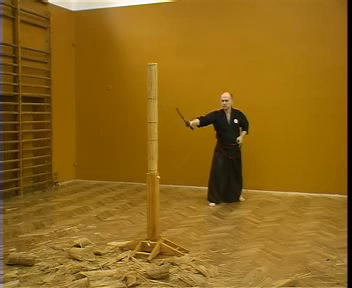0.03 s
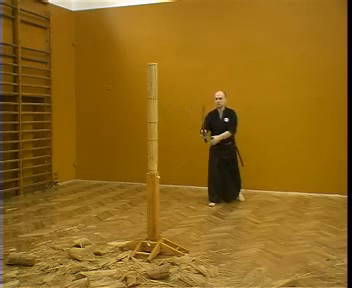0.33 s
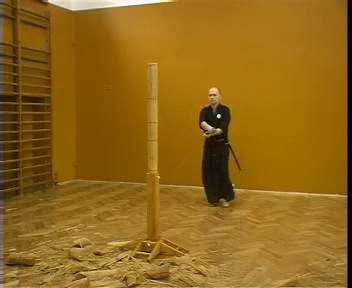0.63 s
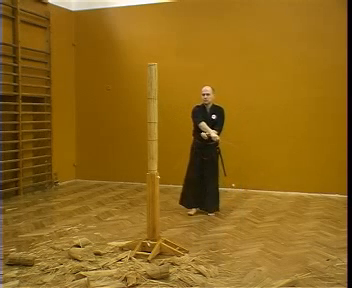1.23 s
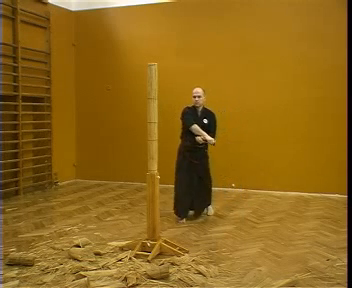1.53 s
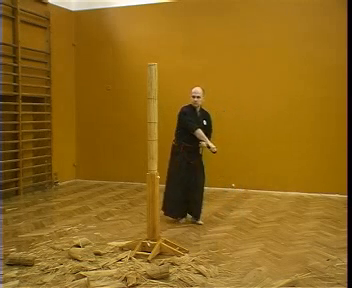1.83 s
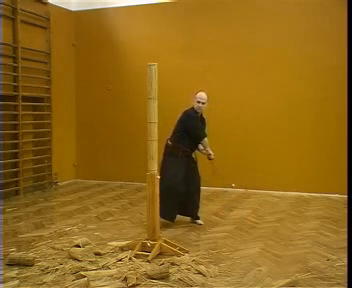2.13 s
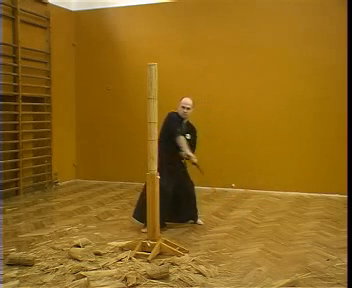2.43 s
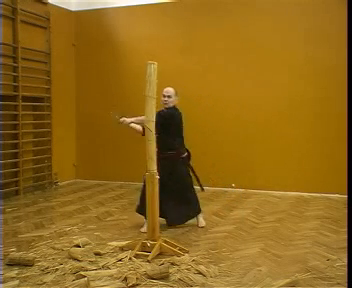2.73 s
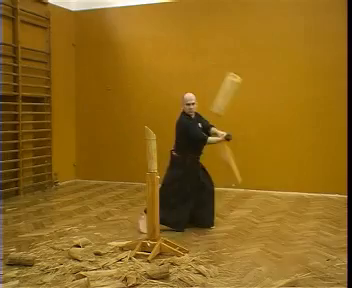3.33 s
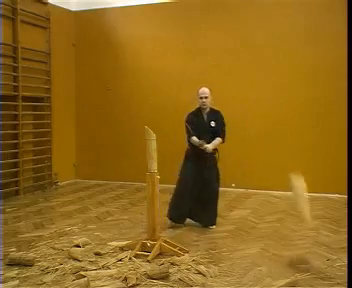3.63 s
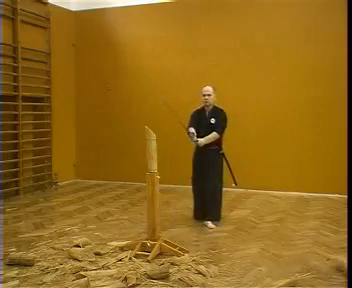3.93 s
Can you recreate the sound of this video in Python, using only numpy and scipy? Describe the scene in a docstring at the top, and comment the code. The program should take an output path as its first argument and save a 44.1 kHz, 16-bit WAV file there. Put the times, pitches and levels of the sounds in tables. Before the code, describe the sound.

A sword slices a straw roll twice, then the pieces slap down in a reverberant hall.

```python
"""Two sword cuts in a gym

Bare feet and robes move quietly over a mains buzz and the air of a hard, echoing hall.
A swordsman steps up to a rolled straw mat and cuts it twice: each cut is a crack and a short rip
of stalks. The severed pieces slap down on the parquet close by, thump and skid through loose straw."""
import sys
import numpy as np
from scipy import signal
from scipy.fft import rfft, irfft, next_fast_len
from scipy.io import wavfile
from scipy.ndimage import uniform_filter1d

SR = 44100
rng = np.random.default_rng(int(sys.argv[2]) if len(sys.argv) > 2 else 0)


def waveform_to_disk(signal):
    """Save audio, clipped to [-1, 1], as 16-bit WAV at the path in sys.argv[1]."""
    frames = np.transpose(np.atleast_2d(signal))
    scaled = np.clip(frames, -1, 1) * 32767
    samples = np.round(scaled).astype(np.int16)
    wavfile.write(sys.argv[1], SR, samples)


N = 176400

# Reverb time of the gym: f/Hz, t60/s
HALL_T60 = [(100, 5.4), (300, 7.7), (1200, 6.13), (3000, 3.5), (5000, 2.41), (8000, 0.97), (11000, 0.23)]
# EQ of the reverb: f/Hz, gain/dB
HALL_EQ = [(70, -41), (150, -4.5), (300, 1), (700, 1), (1300, 1.5), (2600, 1.5), (6000, 2), (11000, 6.5)]
# Stereo width of the events and reverb, then of the room tone: f/Hz, side/dB
WIDTH = [(25, -12), (60, -20), (130, -58), (300, -98), (550, -23), (1100, -11.5), (2200, -6), (4500, -3),
         (10000, -6.5)]
AIR_WIDTH = [(60, -1), (150, -28), (350, -14), (850, -6.5), (2050, 4.5), (4970, -0.5), (12000, -1)]
# Colour of the room tone: f/Hz, level/dB
AIR_EQ = [(18, -55), (30, -19.5), (266, -11.5), (294, -9), (325, -7), (397, -19), (428, -11), (593, -13),
          (639, -11.5), (821, -10), (1970, -19), (3180, -19.5), (12000, -30.5), (15600, -60), (22000, -120)]
# Strong mains partials, then the contour of the fine buzz on top: f/Hz, level/dB
HUM_PARTIALS = [(300, -66.5), (400, -64), (500, -69), (600, -66), (700, -72.5), (800, -68.5), (1000, -72.5),
                (1200, -68), (1700, -73)]
BUZZ_CONTOUR = [(1000, -78.5), (2200, -79), (2650, -76), (3300, -72), (3700, -82), (4500, -96)]
# Robes and sliding soles: t/s, level/dB, rise/s, decay/s, tilt/(dB/octave)
SWISHES = [(.23, -55.5, .04, 0.13, 2), (.9, -53.5, 0.065, .04, 1.5), (1.16, -49.5, 0.071, 0.079, -1.3),
           (1.321, -61.5, 0.065, .06, 1), (1.65, -56, 0.042, 0.18, -1.5), (1.88, -53, 0.092, 0.17, 2),
           (2.111, -48.5, 0.089, 0.063, 4), (2.28, -53.5, 0.076, 0.17, -1), (2.422, -56, 0.12, 0.073, 2),
           (2.671, -51.5, 0.14, 0.051, 7)]
# Barefoot steps: t/s, level/dB, decay/s, tilt/(dB/octave)
STEPS = [(1.413, -44, 0.011, -0.5), (1.435, -44, .008, -2), (1.50, -54, .02, 0), (1.802, -61, 0.0062, 0.5),
         (2.235, -52, 0.015, -2), (2.388, -43.5, 0.016, -3.5), (2.41, -45, 0.022, -0.5),
         (2.446, -48, 0.0068, -1), (2.525, -50, 0.03, -3.5), (2.654, -46.5, 0.0077, -5)]
# Pieces slapping the floor: t/s, level/dB, rise/s, decay/s, tilt/(dB/octave)
SLAPS = [(3.671, -20, 0.0014, 0.01, 3.1), (3.7024, -12.5, 0.0023, 0.004, 3.5),
         (3.7215, -13.5, 0.0061, 0.0052, 1), (3.726, -12.5, 0.0026, 0.0072, 1),
         (3.7347, -11.5, 0.0026, .004, 1.2), (3.763, -17, 0.0031, 0.0021, -1),
         (3.838, -21, 0.0016, 0.0045, -1)]
# Their weight on the boards: t/s, level/dB, f/Hz, decay/s
THUMPS = [(3.699, -43.5, 50, 0.0094), (3.702, -24.5, 200, 0.004), (3.745, -45.5, 155, 0.063),
          (3.882, -29.5, 169, 0.018), (3.919, -25.5, 239, 0.0094), (3.948, -26, 158, 0.059)]
# Their skids through straw: t/s, level/dB, rise/s, decay/s
SKIDS = [(3.785, -27, 0.027, 0.013), (3.915, -23, 0.043, 0.11), (3.97, -34, 0.02, 0.09)]
# Hollow notes of the roll: t/s, f/Hz, level/dB, decay/s, reverb/dB
KNOCKS = [(2.709, 1250, -16.5, 0.0033, -1), (2.7082, 2820, -21, 0.0021, -7), (3.194, 355, -26.5, 0.013, 8),
          (3.195, 468, -28.5, 0.011, 6.5), (3.1985, 1600, -13, 0.0017, -0.5),
          (3.674, 620, -26.5, 0.017, -4), (3.729, 645, -21.5, 0.0092, 0.5),
          (3.905, 500, -22.5, 0.0097, -2.5)]
# Sword cuts: t/s, crack/dB, rip/dB, rip length/s, thud/dB, crack tilt/(dB/octave), rip reverb/dB
CUTS = [(2.7102, -11, -18.5, 0.043, -40, 0.2, 3), (3.194, -11.5, -17, 0.038, -43.5, 3.3, 3)]
# Noise colour of cloth, step, slap, skid, crack and rip (one curve per cut): f/Hz, level/dB
SWISH_EQ = [(100, -14), (300, -8), (1300, -0.5), (3000, -3), (6000, -9), (11000, -23.5)]
STEP_EQ = [(60, -32), (150, -26), (240, -3.5), (400, -1.5), (700, -4.5), (1300, -9), (3000, -18),
           (10000, -30)]
SLAP_EQ = [(60, -52), (150, -20), (330, -1.5), (480, -5), (680, 2), (1080, -14.5), (1400, -1.5), (2000, 0),
           (3000, -8.5), (4450, -7), (6500, -10.5), (10000, -18.5), (12000, -34)]
SKID_EQ = [(59, -49), (100, -20), (159, -7.5), (256, -12.5), (339, -14), (375, -30), (423, -7), (981, -12),
           (2520, -10), (3070, -13), (7130, -16), (12000, -31), (15600, -60), (22000, -120)]
CRACK_EQ = [(60, -30), (150, -9.5), (400, -5), (750, -13.5), (1300, 4.5), (2000, -0.5), (3100, 2),
            (4700, 0.5), (5800, -3), (7500, -4), (10000, -5), (12000, -22)]
RIP_EQS = [
    [(60, -50), (130, -10), (290, 3.5), (400, -16), (520, 0.5), (850, -2), (1250, -2.5), (1900, -1.5),
     (3200, 0.5), (4700, 0.5), (7000, -1), (10000, -4.5), (12000, -7)],
    [(60, -52), (130, -17), (330, 0), (480, -2), (600, -6), (1100, 3.5), (1600, -4), (2400, 1.5), (3300, 4),
     (4900, 3), (7000, 2), (10000, -4), (12000, -17)],
]

PREDELAY_S, HALL_BUILD_S, HALL_BLUR_OCT = 0.013, 0.0023, 0.11
MAINS_HZ, HEEL_HZ, THUD_HZ, TOP_HZ = 50, 250, 55.5, 12000
AIR_DB, HEEL_DB, SPLIT_DB = -54.5, -5, -11.5
THUMP_RISE_S, CRACK_RISE_S, RIP_DELAY_S = 0.00485, 0.0021, 0.006


def amp(db):
    return 10 ** (np.asarray(db) / 20)


def unit_rms(x):
    return x / np.sqrt(np.mean(x ** 2) + 1e-20)


def curve(points, hz):
    """Read a breakpoint curve on a log frequency axis."""
    f, values = np.transpose(points)
    return np.interp(np.log(hz + 1), np.log(f + 1), values)


def filtered(x, response):
    """Apply a gain that depends on frequency."""
    n = x.shape[-1]
    padded = next_fast_len(n + 4096)
    return irfft(rfft(x, padded) * response(np.fft.rfftfreq(padded, 1 / SR)), padded)[..., :n]


def spread(pair, side_db=0, width=WIDTH):
    """Mix two unrelated signals, as mid and side, to left and right."""
    side = filtered(pair[1], lambda hz: amp(curve(width, hz) + side_db))
    return np.array([pair[0] + side, pair[0] - side])


def pan(x, left_db):
    return x * amp([[left_db], [-left_db]])


def crackle(eq, tilt_db, grain, side_db):
    """A second of coloured stereo noise, clumped into millisecond snaps."""
    clumps = np.exp(grain * unit_rms(uniform_filter1d(rng.standard_normal(SR), size=30)))
    snaps = clumps * rng.standard_normal((2, SR))
    colour = lambda hz: amp(curve(eq, hz) + tilt_db * np.log2(np.maximum(hz, 200) / 2000))
    return unit_rms(spread(filtered(snaps, colour), side_db))


def clock():
    """A second of time around an event, starting a quarter second early."""
    return (np.arange(SR) - SR // 4) / SR


def swell(rise, decay, hold=0):
    """Bell-shaped attack up to time zero, hold, exponential release; all in seconds."""
    t = clock()
    return np.exp(-(np.minimum(t, 0) / rise) ** 2 - np.maximum(t - hold, 0) / decay)


def place(at, x):
    """Lay an event on the timeline with its time zero on the cue."""
    track = np.zeros((2, N + 2 * SR))
    start = round(at * SR) + SR - SR // 4
    track[:, start:start + SR] = x
    return track[:, SR:SR + N]


def in_hall(x, wet_db):
    """Add the gym's diffuse wash: each band stores the energy it receives and leaks it, treble first."""
    delayed = np.interp(np.arange(N) - PREDELAY_S * SR, np.arange(N), x.mean(0))
    hz, t, spectra = signal.stft(delayed, SR, nperseg=512)
    octave = np.log2(hz + 1)
    blur = np.exp(-.5 * ((octave[:, None] - octave) / HALL_BLUR_OCT) ** 2)
    received = blur / blur.sum(1, keepdims=True) @ np.abs(spectra) ** 2
    tail = amp(-60 * t / curve(HALL_T60, hz)[:, None]) ** 2 * (1 - np.exp(-t / HALL_BUILD_S))
    stored = np.abs(signal.fftconvolve(received, tail * t[1], axes=1)[:, :len(t)])
    noise = signal.stft(rng.standard_normal((2, N)), nperseg=512)[2]
    wash = signal.istft(2 * np.sqrt(stored) * noise / noise.std(), nperseg=512)[1][:, :N]
    return x + amp(wet_db) * spread(filtered(wash, lambda f: amp(curve(HALL_EQ, f))))


def room_tone():
    """The hall's air: a steady bed of soft noise."""
    air = filtered(rng.standard_normal((2, N)), lambda hz: amp(curve(AIR_EQ, hz)))
    return amp(AIR_DB) * unit_rms(spread(air, width=AIR_WIDTH))


def mains_buzz():
    """Electrical harmonics: a hum with a fine comb of partials on top."""
    t = np.arange(N) / SR
    comb = [(hz, curve(BUZZ_CONTOUR, hz)) for hz in np.arange(20, 80) * MAINS_HZ]
    partials = HUM_PARTIALS + comb
    return np.sqrt(2) * sum(amp(db) * np.sin(2 * np.pi * (hz * t + rng.random())) for hz, db in partials)


def swishes():
    """Robes and sliding soles rub in soft swells of noise."""
    track = 0
    for at, db, rise, decay, tilt_db in SWISHES:
        friction = crackle(SWISH_EQ, tilt_db, grain=0.21, side_db=2.5)
        track += place(at, amp(db) * swell(rise, decay) * friction)
    return in_hall(track, wet_db=1.5)


def footsteps():
    """Bare heels land with a dull pat and sound a low note in the boards."""
    board = amp(HEEL_DB) * np.sqrt(2) * np.sin(2 * np.pi * HEEL_HZ * clock())
    track = 0
    for at, db, decay, tilt_db in STEPS:
        pat = crackle(STEP_EQ, tilt_db, grain=0.26, side_db=7)
        track += place(at, amp(db) * swell(0.003, decay) * (board + pat))
    return in_hall(track, wet_db=1.5)


def landings():
    """The severed pieces slap the parquet, thump the boards and skid on through straw."""
    slaps = thumps = skids = 0
    for at, db, rise, decay, tilt_db in SLAPS:
        smack = crackle(SLAP_EQ, tilt_db, grain=0.36, side_db=-10)
        slaps += place(at, amp(db) * swell(rise, decay) * smack)
    for at, db, hz, decay in THUMPS:
        board = np.sin(2 * np.pi * hz * clock())
        thumps += place(at + THUMP_RISE_S, amp(db) * swell(THUMP_RISE_S, decay) * board)
    for at, db, rise, decay in SKIDS:
        straw = crackle(SKID_EQ, tilt_db=0, grain=0.23, side_db=-18)
        skids += place(at, amp(db) * swell(rise, decay) * straw)
    return in_hall(slaps, wet_db=1.5) + in_hall(thumps, wet_db=-5) + in_hall(skids, wet_db=1.5)


def mat_knocks():
    """The roll gives hollow, heavily damped notes as it is cut and as it lands."""
    track = 0
    for at, hz, db, decay, wet_db in KNOCKS:
        note = np.sin(2 * np.pi * (hz * clock() + rng.random()))
        track += in_hall(place(at, amp(db) * swell(0.00094, decay) * note), wet_db)
    return track


def sword_cuts():
    """The edge cracks into the roll and jolts the stand, then rips through the stalks."""
    jolt = swell(rise=0.003, decay=0.005) * np.cos(2 * np.pi * THUD_HZ * clock())
    bite = swell(CRACK_RISE_S, decay=0.003) + amp(SPLIT_DB) * swell(CRACK_RISE_S, decay=0.006)
    track = 0
    for (at, crack_db, rip_db, length, thud_db, tilt_db, rip_wet_db), rip_eq in zip(CUTS, RIP_EQS):
        crack = amp(crack_db) * bite * crackle(CRACK_EQ, tilt_db, grain=0.43, side_db=-26)
        stalks = pan(crackle(rip_eq, tilt_db=0, grain=0.18, side_db=-2), left_db=0.5)
        rip = amp(rip_db) * swell(rise=0.0075, decay=0.0079, hold=length - RIP_DELAY_S) * stalks
        track += in_hall(place(at, crack), wet_db=-1.5)
        track += in_hall(place(at + RIP_DELAY_S, rip), rip_wet_db)
        track += place(at, amp(thud_db) * jolt)
    return track


def scene():
    """The full mix, leaning a hair to the left."""
    action = sword_cuts() + mat_knocks() + landings() + footsteps() + swishes()
    return pan(action + room_tone() + mains_buzz(), left_db=0.13)


def record(dry):
    """A soft clip rounds the highest peaks, then a steep low-pass trims the top."""
    rounded = dry / (1 + np.abs(dry) ** 6) ** (1 / 6)
    return filtered(rounded, lambda hz: 1 / np.sqrt(1 + (hz / TOP_HZ) ** 160))


dry = scene()
out = record(dry)
waveform_to_disk(out)
```